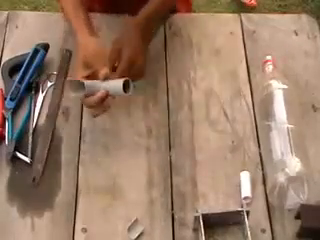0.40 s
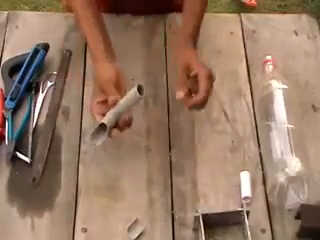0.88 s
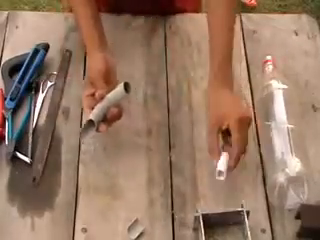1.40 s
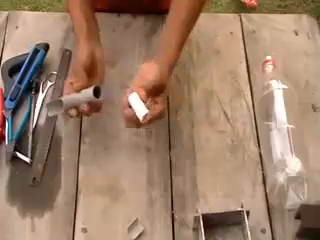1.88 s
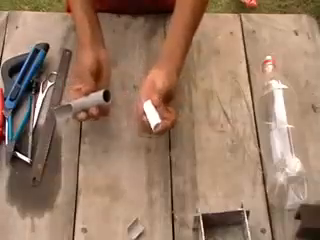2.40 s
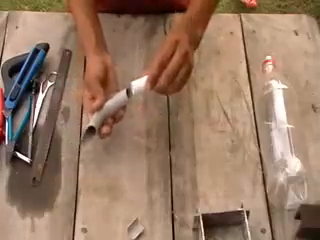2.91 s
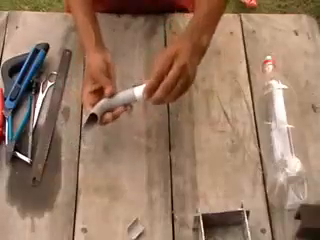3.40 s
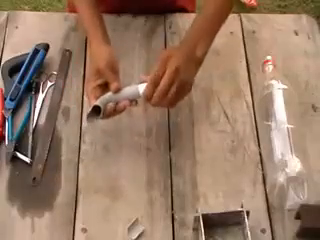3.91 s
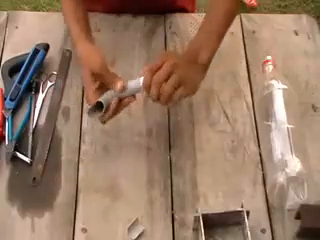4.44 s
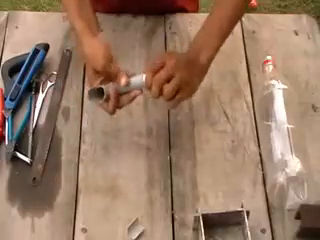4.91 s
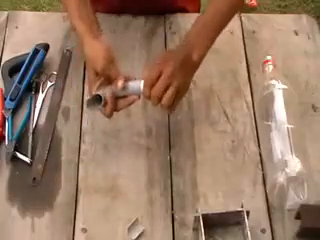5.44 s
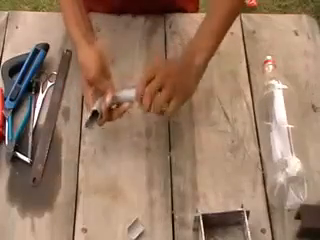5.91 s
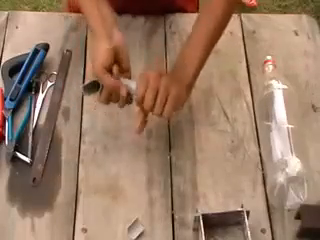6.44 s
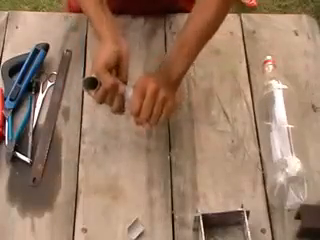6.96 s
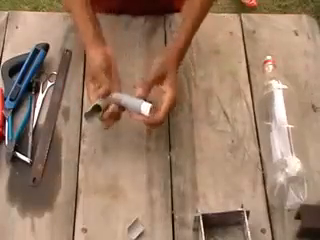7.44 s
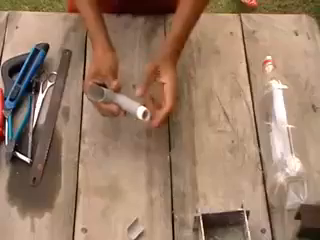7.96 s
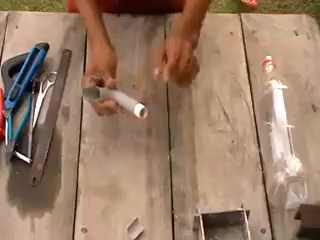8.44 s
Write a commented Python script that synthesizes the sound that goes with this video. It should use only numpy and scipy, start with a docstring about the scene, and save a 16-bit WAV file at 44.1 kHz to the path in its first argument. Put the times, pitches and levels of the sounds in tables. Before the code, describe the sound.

A low, slightly wavering hum, lumpy rumble, soft outdoor hiss and a faint thin device whine continue throughout. In the first 1.2 seconds there are only faint, blurred whistles from a farther bird and a couple of weak chirps. At about 1.25 seconds a small songbird close to the microphone starts loudly, with fast rising sweeps and paired tones. From 2.3 to 3.1 seconds a stepping, rattling phrase repeats three times; from 3.2 to 4.2 softer alternating rising chirps form a quick trill. From 4.3 to 6.4 the song becomes dense and varied, with double whistles, hooks, falls and chatter. The stepping phrase returns at 6.5 to 7 seconds, followed by two high shaking buzzes around 7.2 and 7.4 and a last rising chirp at 7.5. Short echoes trail the notes, the loudest slightly overloaded. Hum and a stronger rumble remain until 8.6 seconds.

```python
"""A low hum, a lumpy rumble and soft hiss come first, with the camera's thin whine and faint whistles over them.
A small songbird close by soon pours out fast gliding whistles, often two at once from the two sides of
its voice box: each is a sine that slides in pitch. Walls throw each note back as a short tail of random
echoes; a farther bird sings faintly, heard mostly as echo. The loudest notes overload the input."""
import sys
import numpy as np
from scipy import signal
from scipy.fft import rfft, irfft
from scipy.io import wavfile
from scipy.ndimage import uniform_filter1d

SR = 44100
rng = np.random.default_rng(int(sys.argv[2]) if len(sys.argv) > 2 else 0)


def inscribe(sig):
    """Save sig as 16-bit PCM at rate SR to the path in sys.argv[1].

    A 1-D sig is mono; a 2-D sig holds one channel per row.
    Samples are clipped to [-1, 1] before scaling.
    """
    pcm = np.round(np.clip(np.atleast_2d(sig).T, -1, 1) * 32767)
    wavfile.write(sys.argv[1], SR, pcm.astype(np.int16))


def linear_from_db(decibels):
    """Turn decibels (scalar or array-like) into linear amplitude factors; 0 gives 1."""
    return 10 ** (np.asarray(decibels, float) / 20)


N = 378378  # length of the scene in samples


def evened(x):
    """Scales a sound so that its rms (its average strength) is 1."""
    return x / np.sqrt(np.mean(x ** 2) + 1e-20)


def read(points, hz):
    """Reads a curve of (Hz, value) points along a logarithmic pitch axis, much as the ear spaces pitch."""
    f, value = np.transpose(points)
    return np.interp(np.log(hz + 1), np.log(f + 1), value)


def slow(rate_hz):
    """A random wander of rms 1: slow sines up to rate_hz, the slower ones stronger."""
    t = np.arange(0, N + 512, 256) / SR
    rates = rate_hz * np.geomspace(.05, 1, num=24)
    wander = sum(np.sin(2 * np.pi * (f * t + rng.random())) / np.sqrt(f) for f in rates)
    return np.interp(np.arange(N) / SR, t, evened(wander))


def hum():
    """A low near-sine that wavers in pitch and level."""
    level_db = -33.5 + 0.68 * slow(9)
    hz = 50 + 1.4 * slow(9.2)
    return np.sqrt(2) * linear_from_db(level_db) * np.sin(2 * np.pi * np.cumsum(hz) / SR)


def whine():
    """The camera's own steady thin tones, each a plain sine."""
    # Each row: pitch in Hz, rms level in dB.
    tones = [(1200, -68), (2401, -70), (5399, -65), (6002, -72), (7800, -78), (11999, -72)]
    t = np.arange(N) / SR
    return np.sqrt(2) * sum(linear_from_db(db) * np.sin(2 * np.pi * hz * t) for hz, db in tones)


def rumble():
    """Low noise rings a few hollow resonances in lumps and dull swells, partly shared by left and right."""
    # The resonances. Each row: pitch in Hz, width in Hz, strength in dB beside the others.
    rings = [(114.6, 8.5, 0.5), (145.4, 18, 3), (181.5, 27, 4), (241, 18, -7), (440, 52, -16)]
    # The underlying level. Each row: time in seconds, level in dB.
    level_points = [(0.0, -43.5), (1.0, -49.5), (2.3, -49.5), (3.3, -47.5), (4.4, -44), (5.3, -40),
                    (6.5, -45.5), (7.1, -40.5), (7.8, -35), (8.58, -35.5)]
    # Dull swells that stand out. Each row: time of the peak in seconds, added level in dB, width in seconds.
    swells = [(.98, -40.5, 0.028), (1.17, -40, .03), (1.39, -35.5, 0.06), (1.79, -35.5, .04),
              (1.91, -36, 0.021), (2.0, -32, 0.036), (2.291, -39.5, 0.012), (2.75, -31, 0.079),
              (3.99, -28, 0.068), (4.16, -40.5, 0.027), (4.62, -43, 0.073), (5.09, -35, 0.018)]
    lump_db, lumps_per_s = 3, 9  # rms depth of the lumps and their fastest rate
    hz, t = np.fft.rfftfreq(N, 1 / SR), np.arange(N) / SR
    power = sum(linear_from_db(2 * db) / (1 + (2 * (hz - f) / width) ** 2) ** 2 for f, width, db in rings)
    noise = rng.standard_normal((3, N))
    both, left, right = irfft(rfft(noise) * np.sqrt(power), N)
    level = linear_from_db(np.interp(t, *np.transpose(level_points)) + lump_db * slow(lumps_per_s))
    level += sum(linear_from_db(db) * np.exp(-((t - s) / width) ** 2) for s, db, width in swells)
    return level * evened(np.array([both + .7 * left, both + .7 * right]))


def air():
    """Wide outdoor noise and microphone hiss: random spectra whose level drifts in patches."""
    # The colour of the noise. Each row: pitch in Hz, relative level in dB.
    colour = [(41, -29.5), (70, -1.5), (103, -20), (165, -15), (297, -19), (1070, -33), (1350, -27.5),
              (2260, -39), (4070, -40.5), (4760, -43.5), (5580, -41), (8560, -50), (12000, -37),
              (13800, -67.5), (15400, -105)]
    # How alike left and right are. Each row: pitch in Hz, likeness (1 = the same, 0 = unrelated).
    likeness = [(60, 0.19), (180, 0.48), (550, 0.1), (1640, 0.37), (4960, 0.29), (15000, 0.23)]
    level_db, patch_db = -41, 2.5  # both rms
    frames, hz = N // 256 + 5, np.fft.rfftfreq(1024, 1 / SR)
    a, b, c, d, patches = rng.standard_normal((frames, 513, 5)).T
    patches = uniform_filter1d(patches, 12, 0)  # smooth across pitch
    patches = evened(uniform_filter1d(patches, 14, 1))  # smooth across time
    same = np.clip(read(likeness, hz), -1, 1)[:, None]
    left, other = a + 1j * b, c + 1j * d
    right = same * left + np.sqrt(1 - same ** 2) * other
    spectra = np.array([left, right]) * linear_from_db(read(colour, hz)[:, None] + patch_db * patches)
    noise = signal.istft(spectra, nperseg=1024, noverlap=768)[1][:, :N]
    return linear_from_db(level_db) * evened(noise)


def sing(mix, rows, throb_hz=200, throb=0, shake_hz=0):
    """Adds each row as a gliding sine: rising notes swell late, falling or quickly settling ones early.

    Breath roughens the tone; throb makes its level beat, shake_hz its pitch."""
    longest_lead_ms = 5  # a note is already gliding, softly, before it is fully heard
    octave_db = -27  # overtone, beside the main tone
    breath = evened(signal.oaconvolve(rng.standard_normal(N), np.hanning(60), "same"))
    for s, ms, start_hz, end_hz, bend, db in rows:
        ratio = end_hz / start_hz
        wide = min(4 * abs(np.log(ratio)), 1)  # near 0 for level notes, which start abruptly
        lead_ms = wide * min(longest_lead_ms, ms / 5)
        t_ms = np.arange(-lead_ms, ms + 1.2, 1000 / SR)
        whole = np.linspace(0, 1, len(t_ms))  # progress through the stroke, lead included
        done = np.minimum(t_ms / ms, 1.12)  # progress of the glide
        at = max(round((s - lead_ms / 1000) * SR), 0)
        bend = bend + 1e-3  # avoids dividing by zero
        beat = np.cos(2 * np.pi * throb_hz * t_ms / 1000)

        glide = np.where(done > 0, 1 - np.exp(-bend * done), bend * done) / (1 - np.exp(-bend))
        hz = start_hz + (end_hz - start_hz) * glide - shake_hz * beat
        phase = 2 * np.pi * np.cumsum(hz.clip(900, 10000)) / SR

        lateness = 1.347 * ratio ** 0.27 * np.exp(-.06 * bend - 0.39 * (1 - wide))
        arch = np.sin(np.pi * whole ** lateness).clip(0)
        swell = arch ** .8 * np.tanh(4 * arch) * (1 - throb * beat)  # soft edges

        puff = breath[at:][:len(t_ms)]
        octave = (1 + .6 * puff) * np.sin(2 * phase)
        tone = (1 + 0.13 * puff) * np.sin(phase) + linear_from_db(octave_db) * octave
        tone += 0.02 * rng.standard_normal(len(t_ms))  # faint wide hiss under each stroke
        mix[at:at + len(t_ms)] += np.sqrt(2) * linear_from_db(db) * swell * tone


def syllables():
    """Spells out the song stroke by stroke: each syllable is its pattern, shifted in pitch and stretched in time."""
    # The strokes of each named syllable, the lead first. Each row: delay in ms, length in ms, start in Hz,
    # end in Hz, bend (+ glides early, - glides late), level in dB added to that of the syllable.
    patterns = { "rise": [(0.0091, 30, 2794, 3620, 1.2, 0)],
                "slow rise": [(0.0035, 38, 2680, 3620, 1.8, -1)],
                "quick rise": [(0, 12, 2600, 4330, 1.1, 0)], "twin hook": [(0, 14, 2740, 4312, 2.6, 0),
                (6, 12, 2892, 3827, 2.1, -2.5)], "hook": [(1.5, 16.5, 2600, 3930, 2.3, 0.5),
                (-10, 15, 1300, 2700, 1.3, -19), (1.6, 8, 4800, 7000, 2.1, -19.5)],
                "long rise": [(0, 42, 2880, 5353, 2.1, 0.5), (1.1, 20, 3367, 5590, 2.2, -7)],
                "double rise": [(0, 22, 2400, 5230, 2.2, -0.5), (9.5, 11, 3000, 4100, .4, -0.6)],
                "fork": [(0, 40, 3605, 4700, -1.4, -0.5), (0.6, 15, 4040, 5210, 3.5, -10.5)],
                "ladder": [(-0.5, 21, 3800, 4960, 3, 0), (-12, 7.6, 2750, 3760, 0.4, -6.5),
                (-13.5, 7.2, 3500, 4500, -1.5, -7)], "broken rise": [(0, 17, 4200, 4560, -3, 0),
                (-4.5, 6.5, 3450, 4280, .4, -2), (-19, 15, 3350, 3950, .6, -9),
                (-25, 20, 2700, 3350, 1.5, -18), (-24, 15, 5350, 7150, .6, -18)],
                "step": [(0, 36, 6120, 6800, 2.2, 0), (-4, 6.5, 3400, 6100, 1.6, -5),
                (-21, 16, 4880, 5250, -2, -1)], "rattle": [(0, 11, 4800, 3150, .6, 0),
                (-4, 25, 3900, 1450, 1.7, -7), (5, 13, 5100, 3600, 1, -3), (7, 14.5, 5900, 4050, 1, -4),
                (11, 14, 6600, 4780, .6, -8), (17, 9, 1650, 1070, -1.5, -21)],
                "level pair": [(0, 34, 5800, 6140, 9, 0), (1.5, 27, 4830, 4790, 1, 2)],
                "close pair": [(0, 40.1, 5447, 5240, -1.5, 0.5), (0.1, 36, 4628, 4317, 3, -2.5)],
                "falling pair": [(0, 40, 5490, 4597, 5, -0.5), (2.1, 24, 4380, 3734, 1.5, 1)],
                "high falling pair": [(0, 42, 7670, 6287, 4, 0.5), (2.1, 40, 5990, 4928, 4, -1.5)],
                "flick": [(0, 15, 6430, 8250, 2, 0), (18, 36, 6080, 5980, 2, -2)],
                "chatter": [(1.5, 9, 4900, 5350, 1.5, -0.5), (-3, 15, 8050, 2300, -1, -10.5),
                (8, 34, 4550, 2700, .8, -6)]}
    # When each named syllable is sung. Each row: start in seconds, level in dB, pitch factor,
    # length factor, and for some the dB added to the strokes beside the lead.
    song = { "rise": [(1.7922, -1.5, 1.16, 0.82), (2.5243, -10, 0.86, 0.86), (2.8239, -10, 0.85, 0.97),
            (4.6935, -7, .985, .8), (5.007, -8.5, .93, .65), (5.181, -8, .98, .72),
            (5.633, -6.5, 1.04, .98), (5.9774, -4.5, 1.137, 1), (6.7096, -11, .85, 1.02)],
            "slow rise": [(3.325, -15.5, 1.03, 0.95), (3.519, -17, 0.99, 1.06), (3.705, -11, 1.031, 1.03),
            (3.89, -12.5, 1.005, 0.88), (4.068, -9, 1.026, 1.05), (4.766, -7, 0.94, 0.96),
            (5.27, -3.5, 1.02, 1.08)], "quick rise": [(3.1172, -21.5, 0.83, 1.4), (4.54, -6, 1.02, 0.68),
            (5.017, -4.5, 1.04, 1.1), (5.546, -10, 0.96, 1.05), (6.2286, -5, 0.98, 1.006)],
            "twin hook": [(5.077, -3.5, 0.97, 0.91, -1), (5.344, -5, 1.005, 1, 1),
            (5.698, -4, 1.005, 0.93, -0.9)], "hook": [(.3535, -20, .84, 0.67, 10.5),
            (1.4835, -2, 1.02, 0.89, -2.5), (2.0487, -3, 1, 0.97, -2.3), (7.0773, -5.5, .89, 1.15, -4)],
            "long rise": [(4.899, -3, 0.99, .87, -2.5), (5.1395, -1.5, .99, 1.08, 1),
            (5.4988, -1, 1.002, .98, 2)], "double rise": [(1.6905, -5.5, .995, 1, 1.9),
            (5.879, -7, 1.02, 1.15, -2.5)], "fork": [(2.1235, -1, 1.01, .9, -2.5),
            (6.293, -2.5, .985, 1.25, 3.5)], "ladder": [(.4757, -23.5, 1.033, 1.02, 5.5),
            (3.2325, -12.5, 1.016, 1.12, -0.5), (3.43, -10.5, 1, 1.07, -0.3),
            (3.6057, -7, 1.007, 0.98, -1.5), (3.787, -7.5, 1.005, .9, -1.35),
            (3.972, -5.5, 0.98, 1.14, -1.4), (4.1579, -8.5, 0.96, 0.98, 2.5)],
            "broken rise": [(2.45, 0.5, 1.01, 0.89, 0.9), (2.748, -1, 1.01, 0.93, 0.5),
            (3.0585, -2, .995, 1.01, -1), (6.6315, -0.5, 1.011, 1.03, 0.7),
            (6.9375, -1, 1.013, 0.97, -0.5)], "step": [(2.327, -0.5, 1, 1.09, -0.2),
            (2.6185, -0.5, 1, 1.06, 1), (2.928, -1, 0.99, 1, -1), (6.506, -4.5, .99, 1.05, 5.5),
            (6.809, -3.5, 0.98, 1.05, -0.2)], "rattle": [(2.3825, -11, 1.01, 0.85, -2.5),
            (2.679, -9.5, 1.02, 0.84, -1.2), (2.989, -14.5, 1.02, 0.96, 1),
            (6.5645, -10.5, 1.008, 0.91, -2.5), (6.8662, -16, 1, 1.06, 1)],
            "level pair": [(1.255, -6.5, 1.025, 0.75, .5), (1.5685, -4, 0.98, 1.14, -1.8),
            (5.76, -7, .994, 1.1, 3.5)], "close pair": [(1.9615, -2, 1.005, 0.8805, -2.5),
            (6.1465, -9, .995, 1.1, 3)], "falling pair": [(4.4, -10.5, .998, 1.15, -0.8),
            (4.557, -9, 1.005, 0.98, -3), (4.6, -7.5, 0.971, 1.1, -1), (4.649, -5, 1.025, 0.98, -3.5),
            (4.877, -9.5, 1.02, 1.01, 2.8), (5.0865, -11, 1.01, 1.1, 2.5)],
            "high falling pair": [(1.849, -7.5, 0.99, 0.9, 0.4), (6.035, -10.5, 1.01, 1.18, 1.5),
            (7.002, -11.5, 1.03, 1.1, 6.5)], "flick": [(5.6, -12, .992, 1.03, -2.5),
            (5.86, -13.5, 1.009, .98, 2.5)], "chatter": [(6.043, -9, .95, .95, -2),
            (6.098, -8.5, .985, .95, -1), (6.2152, -10.5, 1.02, .9, 2.1), (6.277, -9, 0.98, 0.87, -2.5)]}
    strokes = []
    for name, rows in song.items():
        for s, db, pitch, pace, *side_db in rows:
            for k, (delay_ms, ms, start_hz, end_hz, bend, own_db) in enumerate(patterns[name]):
                stroke_db = db + own_db + sum(side_db) * (k > 0)
                start_s = s + pace * delay_ms / 1000
                strokes.append((start_s, pace * ms, pitch * start_hz, pitch * end_hz, bend, stroke_db))
    return strokes


def near_bird():
    """The close songbird: its two voices mix a little in one throat, and throat and beak dull the top."""
    # Whistles sung only once. Each row: start in seconds, length in ms, start in Hz, end in Hz,
    # bend (+ glides early, - glides late), level in dB before throb, throat and beak.
    whistles = [(0.002, 114, 3970, 3877, 18, -38), (4.293, 43, 4585, 5090, 7.5, -15.5),
                (4.298, 25, 6250, 5923, -3.5, -21.5), (4.7961, 49, 5614, 5720, 7.5, -6),
                (4.799, 25.6, 4816, 4680, 2.2, -5.5), (4.8049, 7.9, 6580, 7090, 13.4, -17.5),
                (4.8189, 24, 6483, 6420, -3, -12.5), (5.3104, 43.2, 5130, 5726, 6.5, -11),
                (5.3147, 20, 6244, 6433, 2.5, -5.5), (5.3943, 20, 4250, 3685, -0.1, -6.5),
                (5.408, 25, 5965, 6176, 5, -4), (5.698, 14, 5700, 4914, 2, -13),
                (5.7064, 25, 4895, 4519, 0.5, -12), (5.933, 10, 1500, 4716, 2.5, -16),
                (5.942, 10, 4750, 5650, 2, -11.5), (5.953, 5, 8330, 4960, -1, -19),
                (5.958, 8.9, 4800, 4306, 5.5, -3), (5.972, 50, 4335, 2654, 1.6, -14),
                (6.041, 6.5, 6190, 3950, 4.5, -6.5), (6.163, 32, 4100, 2828, 1, -18),
                (6.247, 7, 2380, 3250, 6.5, -13), (7.115, 42, 3737, 4830, 5, -7.5),
                (7.116, 3.5, 4440, 6000, -3, -7.5), (7.1223, 41, 5978, 6320, 6.5, -4.5),
                (7.492, 25, 2490, 5450, 1.5, -11), (7.5, 20, 2638, 4394, 2.4, -7)]
    # Throbbing whistles. Each row: the same columns as the whistles.
    throbs = [(1.3679, 42.5, 2255, 3564, 1.08, -9.5), (2.2191, 48.6, 2080, 3864, 2.04, -6.5),
              (4.4913, 31.13, 2675, 3135, 4.5, -18), (4.9645, 24.35, 2520, 3200, 4.4, -17),
              (5.3979, 44.7, 5480, 4744, 10, -6.5), (5.7958, 36.8, 2440, 3466, 4.9, -12),
              (6.3966, 44.75, 2200, 3760, 1.4, -7)]
    # Falling buzzes whose pitch shakes quickly. Each row: the same columns as the whistles.
    buzzes = [(7.224, 58.2, 8685, 6710, 3.4, -7.5), (7.362, 58.1, 8870, 6330, 1.2, -9)]
    near = np.zeros(N)
    sing(near, syllables() + whistles)
    sing(near, throbs, throb_hz=225.7, throb=0.55)
    sing(near, buzzes, throb_hz=152, throb=-.35, shake_hz=500)
    near += 0.033 * near ** 2 - 0.12 * near ** 3  # the two voices pull on each other: sum and side tones
    beak_hz = 13100  # little passes above this
    return signal.sosfiltfilt(signal.butter(N=3, Wn=beak_hz, fs=SR, output="sos"), near)


def far_bird():
    """The farther bird: the same gliding sines, blurred by a quick random flutter in level."""
    # Each row: start in seconds, length in ms, start in Hz, end in Hz, bend (+ glides early),
    # level in dB before flutter and mixing.
    notes = [(0.037, 137.2, 3920, 3820, 0.33, -52.5), (.68, 89.4, 4080, 3810, 0.34, -55),
             (.75, 108, 2620, 2900, 1.5, -54), (0.856, 100, 4210, 3980, 0.25, -50),
             (1.029, 100, 4150, 3770, 0.27, -51), (1.108, 90, 2750, 3010, 1.5, -55.5),
             (1.197, 50, 4100, 4170, .3, -44.5)]
    far = np.zeros(N)
    sing(far, notes)
    flutter = evened(uniform_filter1d(rng.standard_normal(N), size=200))
    return far * (0.78 + .6 * flutter)  # moving air and leaves blur the notes


def straight_path(near):
    """The near bird direct and off nearby surfaces (delayed copies), shifting left and right as its head turns."""
    # First reflections. Each row: delay in ms, left gain, right gain.
    reflections = [(1.97, -0.082, 0.048), (3.1, -0.13, -0.0097), (4.3, 0.22, -0.079), (6.6, 0.22, 0.16),
                   (25.32, 0.073, .12)]
    # Head turns. Each row: time in seconds, left above right in dB.
    head_turns = [(0.0, -1.0), (0.21, 0.5), (3.11, 0.0), (3.53, 2.0), (4.42, 1.5), (4.8, 0.0), (6.16, 0.5),
                  (6.82, 0.0), (7.6, 0.5)]
    direct = np.array([near, near])
    for ms, *gains in reflections:
        direct += np.outer(gains, np.roll(near, round(ms * SR / 1000)))
    pan_db = np.interp(np.arange(N) / SR, *np.transpose(head_turns))
    return direct * linear_from_db(np.outer([.5, -.5], pan_db))


def yard(x):
    """Echo tail from sparse taps of random sign, each band dying at its own speed; three tails take turns."""
    # Each row: pitch in Hz, time to die by 60 dB in seconds, side (left-right difference) level in dB.
    bands = [(1500, 0.7, 4.5), (3003, 0.44, -3.5), (5000, 0.41, -20), (8230, 0.49, -4), (12710, 1, -22.5)]
    taps = np.zeros((3, 2, SR // 2))  # three tails, each with a middle and a side part, half a second long
    slots = np.arange(300, SR // 2 - 20, 20)
    at = slots + rng.integers(0, 20, (3, 2, len(slots)))
    np.put_along_axis(taps, at, rng.choice([-1., 1.], at.shape), 2)
    hz, t, z = signal.stft(taps, SR, nperseg=128)
    t60, side_db = (read(np.array(bands)[:, [0, k]], hz)[:, None] for k in (1, 2))
    mid, side = z[:, 0], z[:, 1] * linear_from_db(side_db)  # left and right share the middle part of every echo
    z = np.stack([mid + side, mid - side], axis=1) * linear_from_db(-60 * t / t60)
    z *= 1 + 1.1 * np.exp(-t / 0.04)  # near surfaces answer first and loudest
    tails = signal.istft(z, SR, nperseg=128)[1]
    tails = tails / np.linalg.norm(tails[0, 0])
    turns_per_s = 3.5
    turn = 2 * np.pi * (np.arange(N) / SR * turns_per_s + np.arange(3)[:, None] / 3)
    parts = x * np.sqrt(2 / 3) * np.cos(turn)  # the three shares keep the total power steady
    return signal.fftconvolve(parts[:, None], tails, axes=2)[..., :N].sum(0)


def birds():
    """Mixes the near bird, mostly direct, and the far bird, mostly echo."""
    near, far = near_bird(), far_bird()
    near_echo_db = -5
    return straight_path(near) + .5 * far + yard(linear_from_db(near_echo_db) * near + 2 * far)


def scene():
    """Birds over air, rumble, hum and whine."""
    return birds() + air() + rumble() + hum() + whine()


def band_limit(x):
    """A steep low-pass at the top of the band."""
    return signal.sosfilt(signal.butter(12, 15550, fs=SR, output="sos"), x)


def record(dry):
    """A lopsided input makes sum and difference tones and rounds off peaks; the treble fades; full scale clips."""
    bent = dry + 0.012 * dry ** 2
    ceiling = 1.25  # where 1 is full scale
    rounded = bent / (1 + abs(bent / ceiling) ** 6) ** (1 / 6)
    treble_hz = 12400  # the microphone fades above this
    dulled = signal.sosfilt(signal.butter(N=2, Wn=treble_hz, fs=SR, output="sos"), rounded)
    return band_limit(np.clip(dulled, -1, 1))


dry = scene()
out = record(dry)
inscribe(out)
```